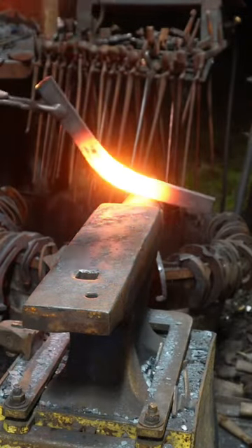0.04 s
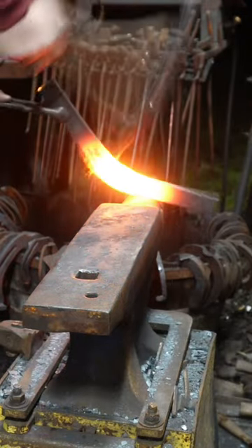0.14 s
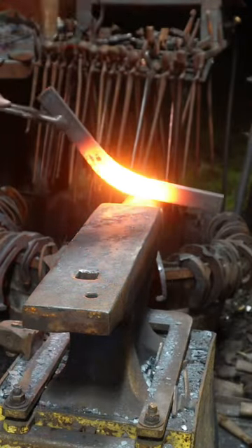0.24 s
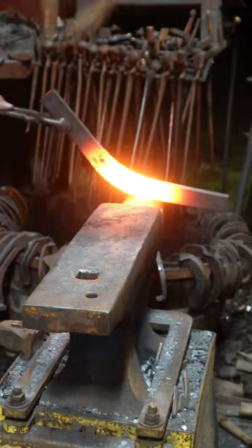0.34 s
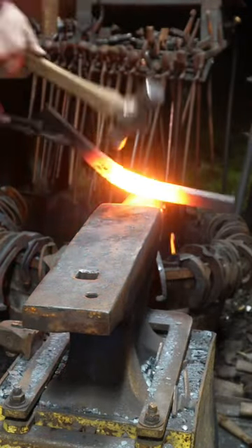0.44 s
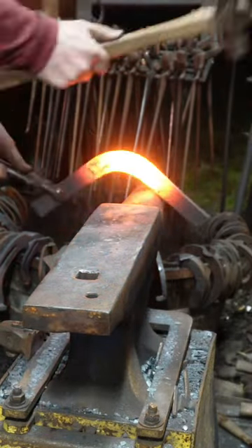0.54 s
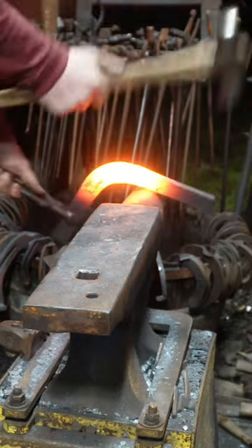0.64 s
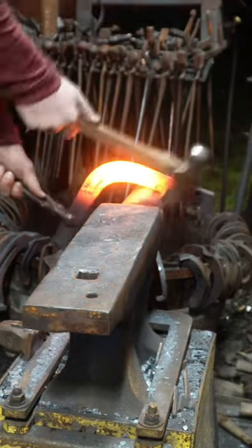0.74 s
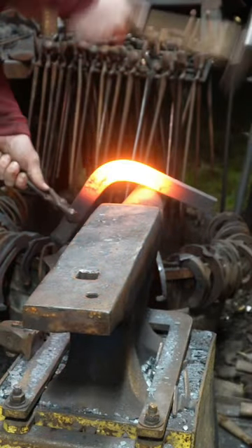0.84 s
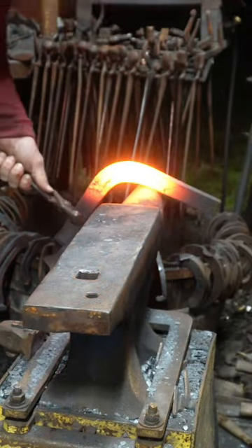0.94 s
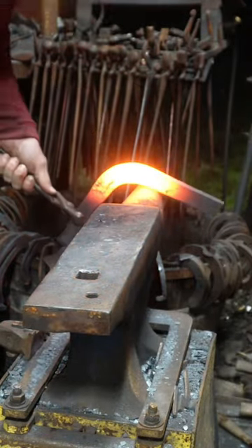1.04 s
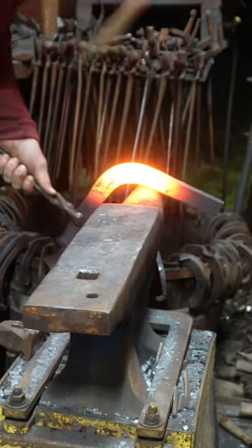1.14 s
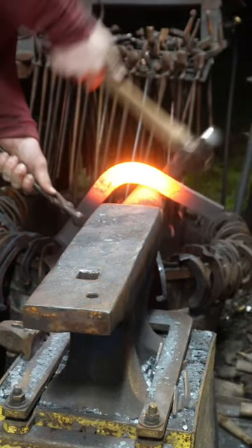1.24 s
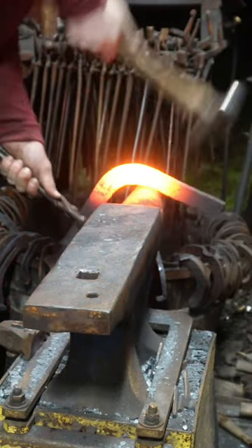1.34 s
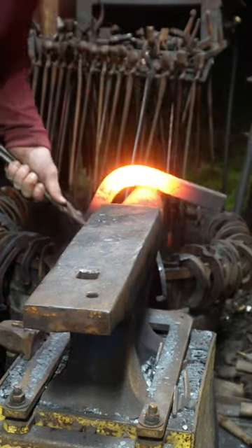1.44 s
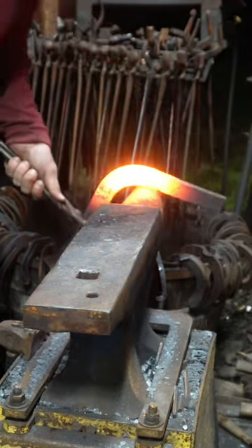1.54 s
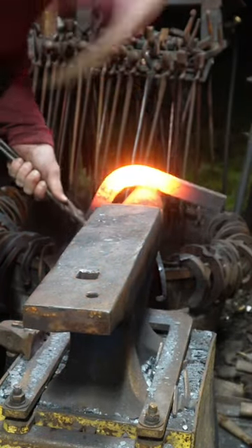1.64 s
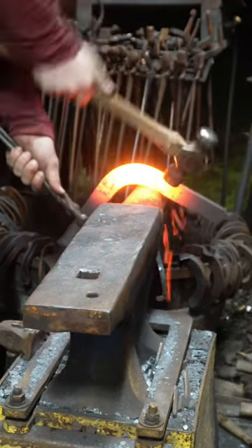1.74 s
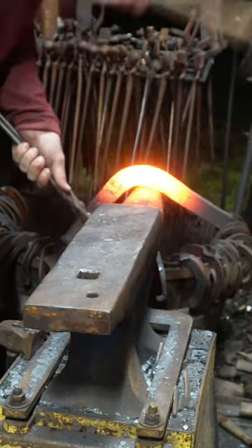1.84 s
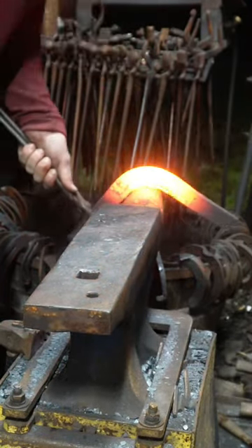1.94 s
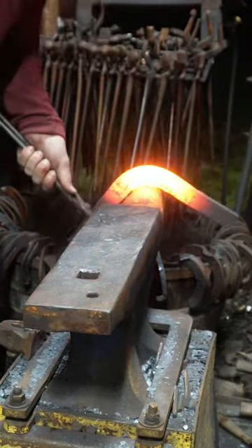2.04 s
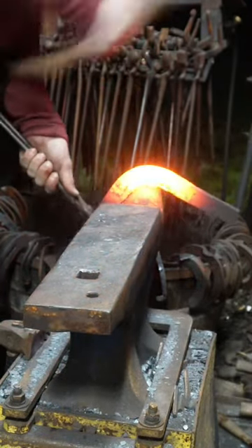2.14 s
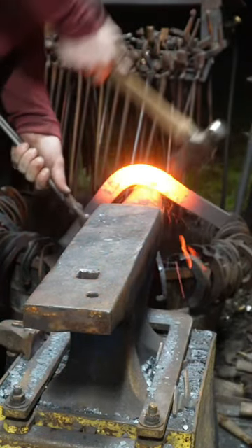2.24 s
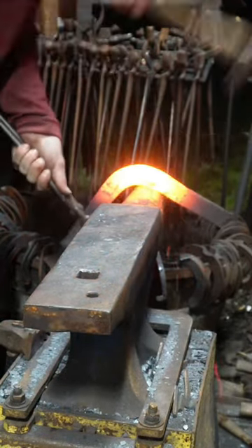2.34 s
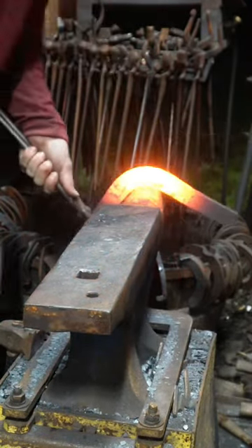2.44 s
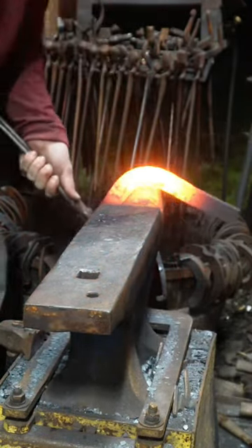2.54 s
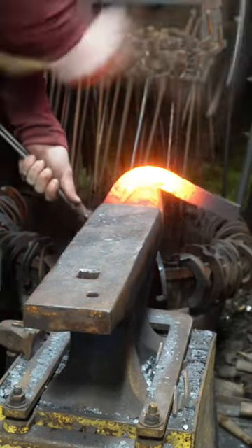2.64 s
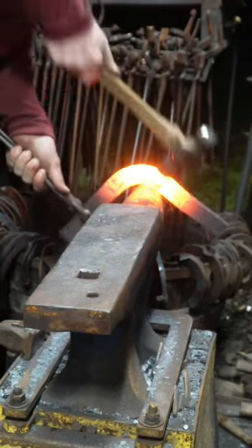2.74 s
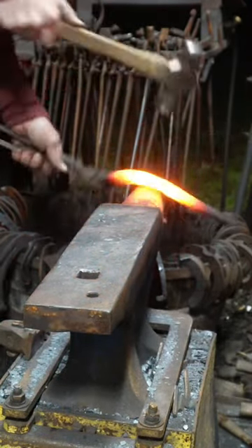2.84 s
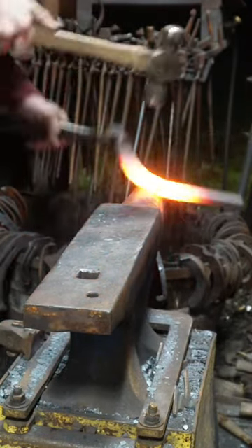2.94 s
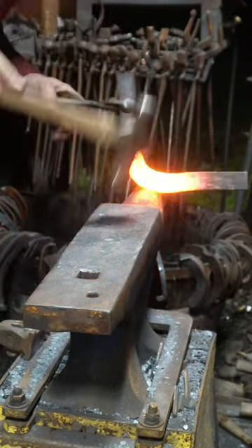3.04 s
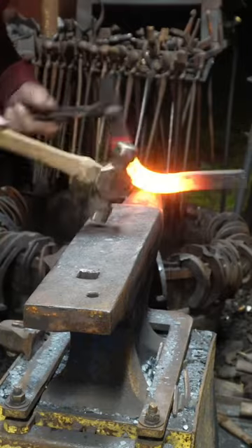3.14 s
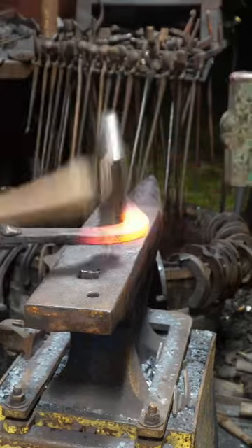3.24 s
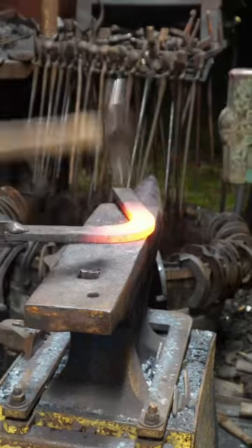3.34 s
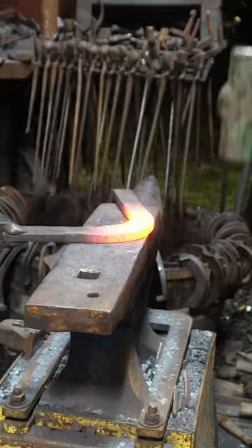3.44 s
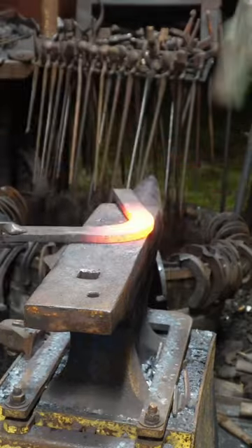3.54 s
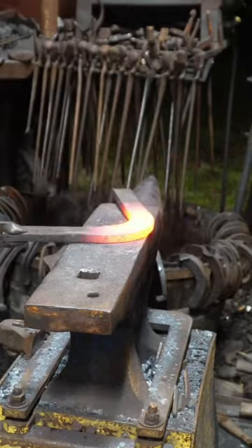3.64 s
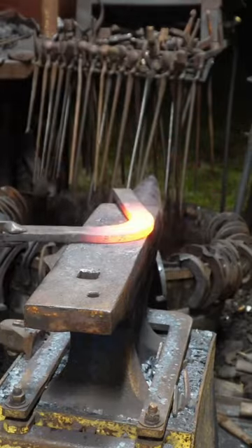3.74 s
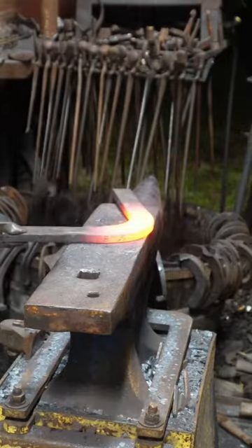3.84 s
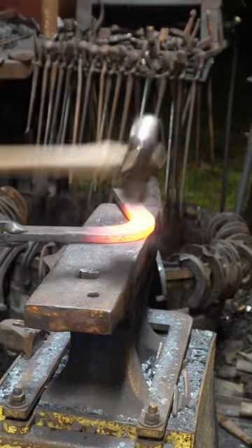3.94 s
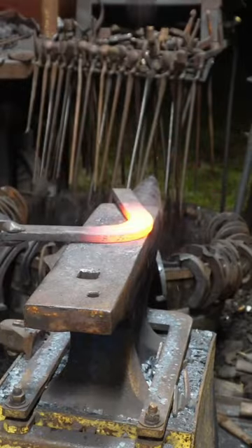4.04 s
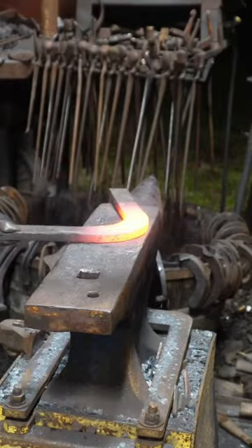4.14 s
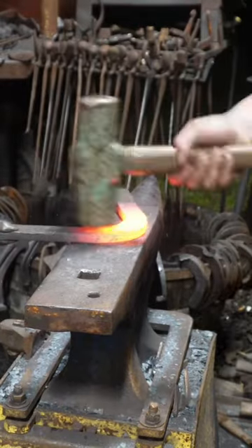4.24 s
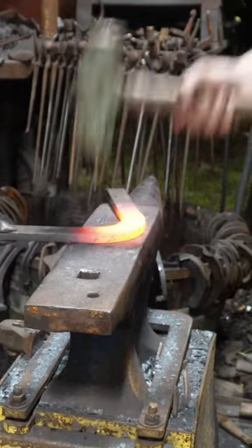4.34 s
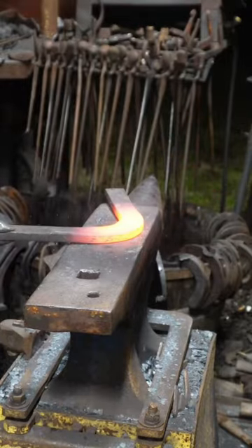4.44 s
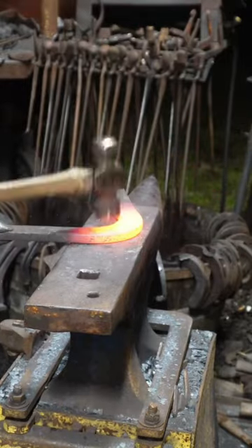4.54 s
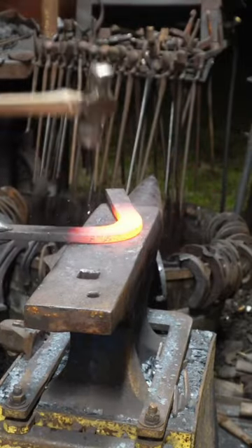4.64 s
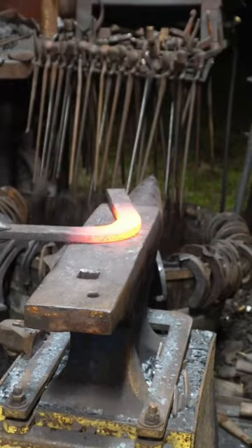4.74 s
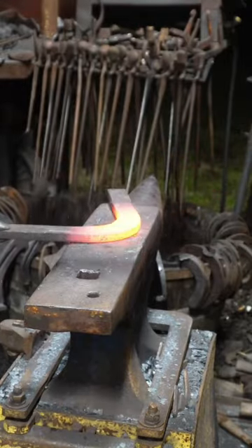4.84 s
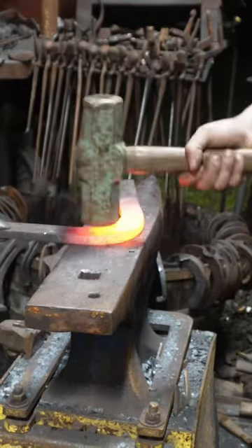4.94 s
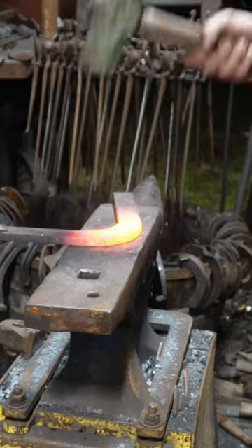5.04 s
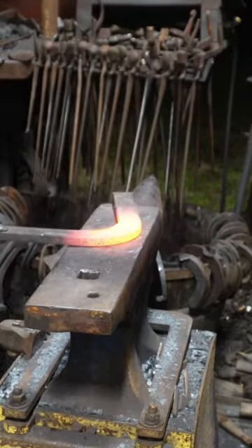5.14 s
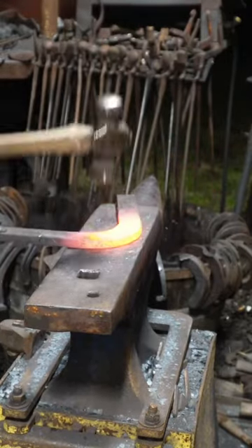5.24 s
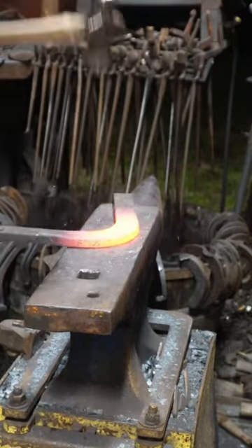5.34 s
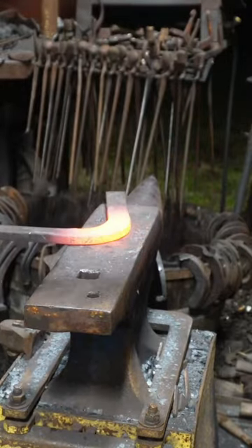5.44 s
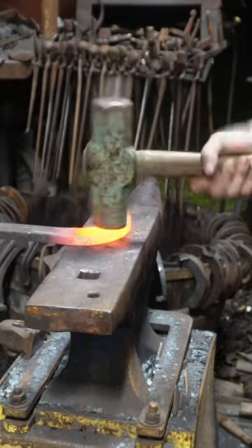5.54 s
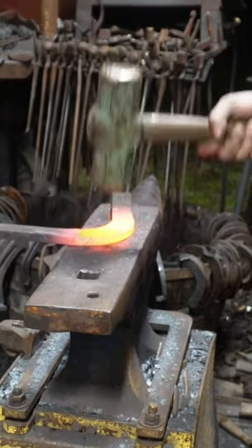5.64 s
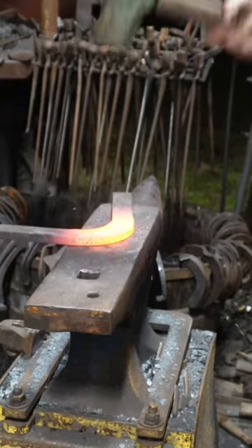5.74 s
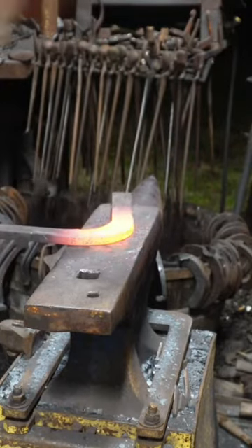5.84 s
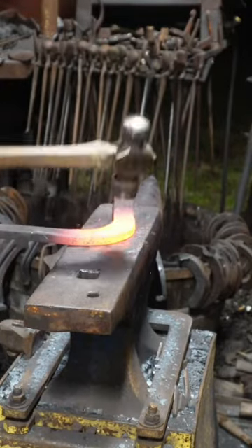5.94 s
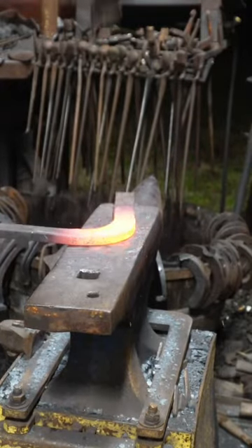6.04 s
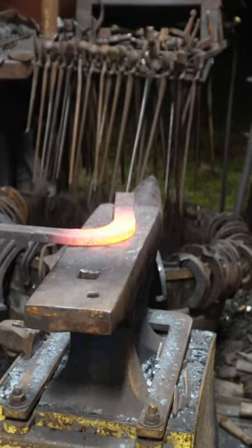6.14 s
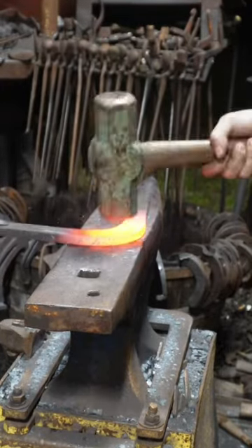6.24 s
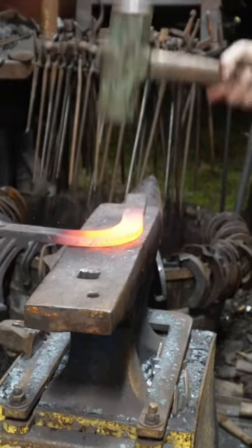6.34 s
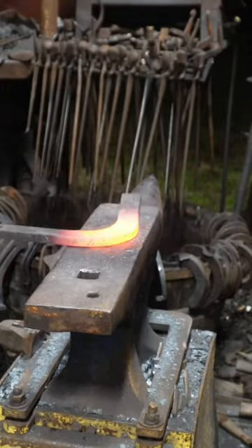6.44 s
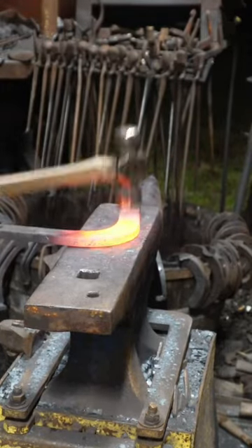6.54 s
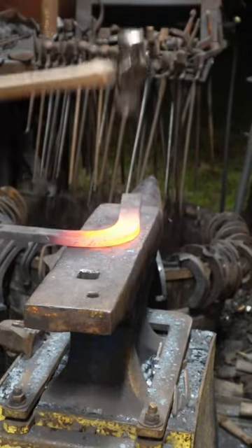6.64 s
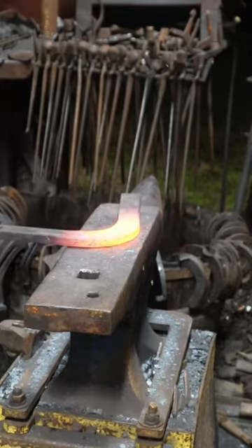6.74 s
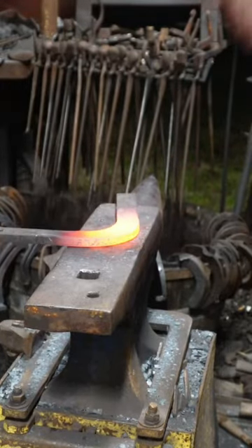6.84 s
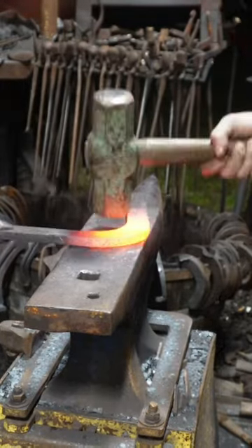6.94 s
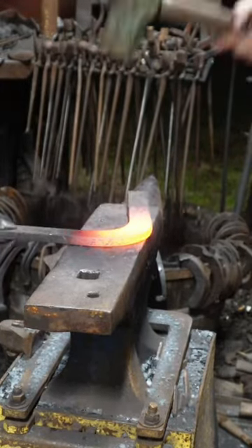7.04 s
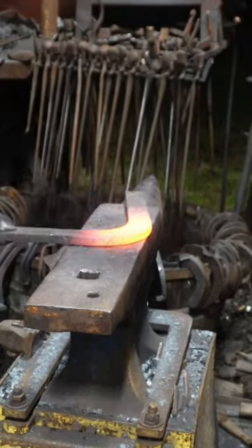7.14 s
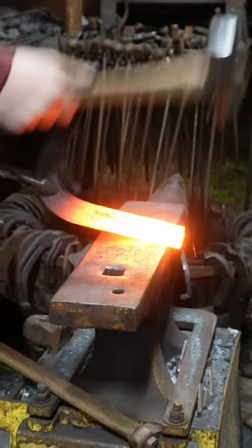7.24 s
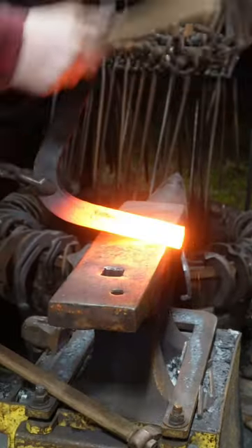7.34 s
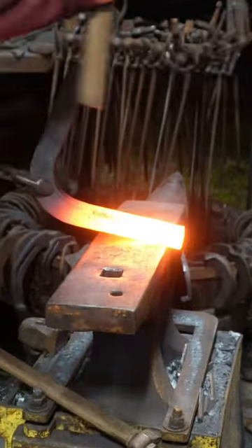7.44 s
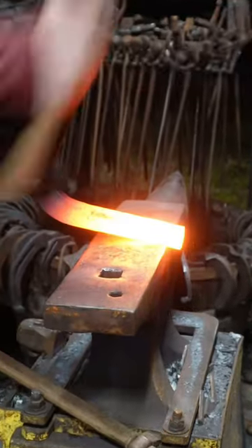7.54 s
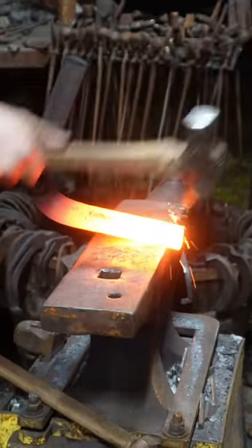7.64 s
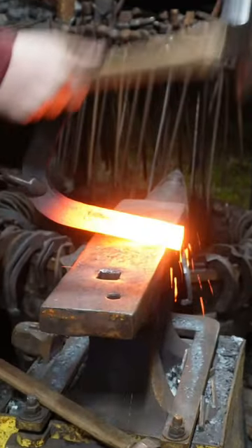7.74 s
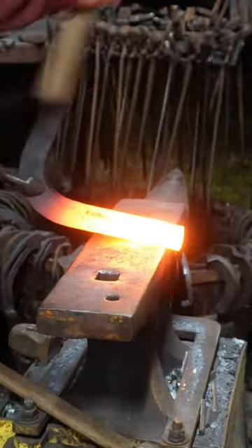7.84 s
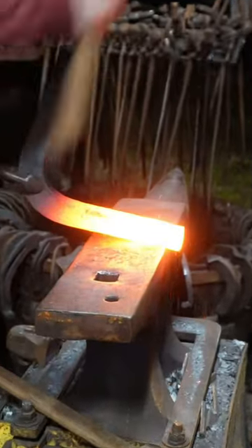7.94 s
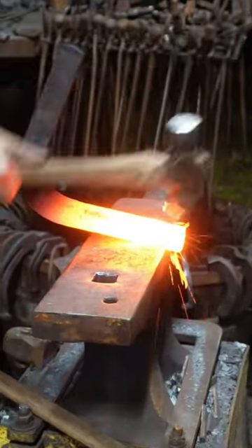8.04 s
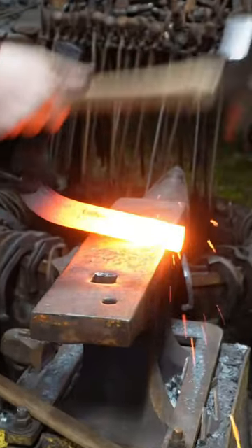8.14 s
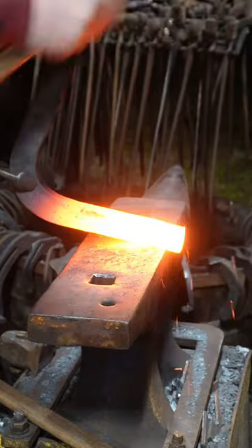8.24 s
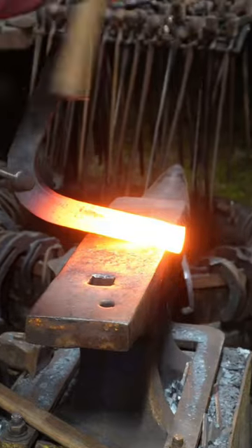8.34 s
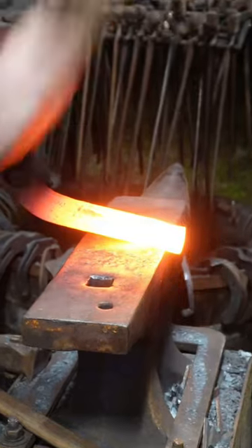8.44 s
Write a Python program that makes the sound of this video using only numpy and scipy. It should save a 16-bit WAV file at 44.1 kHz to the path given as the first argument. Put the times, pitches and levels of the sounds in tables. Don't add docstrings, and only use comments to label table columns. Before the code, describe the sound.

In an open forge shed, a hand hammer and a heavier sledge strike an anvil by turns, rattling tool racks above a steady blower tone and gas hiss.

```python
import sys
import numpy as np
from scipy import signal
from scipy.fft import rfft, irfft, next_fast_len
from scipy.io import wavfile
from scipy.ndimage import uniform_filter1d

SR = 44100
rng = np.random.default_rng(int(sys.argv[2]) if len(sys.argv) > 2 else 0)


def how_loud(loudness_db):
    steps = np.asarray(loudness_db, float) / 20
    return 10 ** steps


def unload_audio(sound):
    columns = np.transpose(np.atleast_2d(sound))
    steps = np.round(np.clip(columns, -1, 1) * 32767)
    wavfile.write(sys.argv[1], SR, steps.astype(np.int16))


N = 373968
KNEE_HZ = 6500


def at_hz(points, hz):
    table_hz, value = np.transpose(points)
    return np.interp(np.log(hz), np.log(table_hz), value)


def butter(x, hz, kind, order):
    return signal.sosfilt(signal.butter(order, hz, kind, fs=SR, output="sos"), x)


def drift(rate_hz):
    r = np.exp(-2 * np.pi * rate_hz * 16 / SR)
    slow = signal.lfilter([1], [1, -2 * r, r * r], rng.standard_normal(N // 16 + 4002))[4000:]
    return np.interp(np.arange(N) / 16, np.arange(len(slow)), slow / slow.std())


def bands(spectrum, likeness, peaky_db, width_hz, top_hz):
    edges_hz = 56 * 2 ** (np.arange(26) / 3)
    centres_hz = np.sqrt(edges_hz[1:] * edges_hz[:-1])
    size = next_fast_len(N)
    bins_hz = np.fft.rfftfreq(size, 1 / SR)
    knots = rng.standard_normal(1200)
    crowd_db = peaky_db * (1 + bins_hz / 9000) * np.interp(bins_hz / width_hz, np.arange(1200), knots)
    crowd = how_loud(crowd_db)
    crowd = crowd / np.sqrt(uniform_filter1d(crowd ** 2, size=size // 40))
    crowd = crowd / (1 + (bins_hz / top_hz) ** 24)
    noise = irfft(rfft(rng.standard_normal((2, 2, size))) * crowd, size)[..., :N]
    noise = noise / noise.std()
    out = []
    for k, hz in enumerate(centres_hz):
        mid, side = butter(noise[k % 2], edges_hz[k:k + 2], "band", order=2)
        alike = np.sqrt(np.clip(at_hz(likeness, hz), 0, 1))
        stereo = np.sqrt(1 + alike) * mid + np.sqrt(1 - alike) * side * [[1], [-1]]
        out.append(how_loud(at_hz(spectrum, hz)) * stereo)
    return np.array(out), centres_hz


def blower(t, level_db):
    phase = 2 * np.pi * np.cumsum(700.35 + 0.487 * drift(0.95)) / SR
    tone = np.sin(phase) + how_loud(-23.5) * np.sin(2 * phase)
    return np.sqrt(2) * tone * how_loud(level_db + 0.67 * drift(9.8)) * how_loud([[.35], [-.35]])


def burner(level_db):
    # hz, level_db_per_hz
    hiss_spectrum = [(60, -62), (100, -61), (170, -25), (215, -16), (280, -26.5), (400, -11), (520, -20),
                     (800, -12.5), (1090, -20.5), (1410, -12.5), (3060, -18), (6020, -19), (6800, -32),
                     (14300, -42.5)]
    # hz, left_right_likeness
    hiss_alike = [(60, 1.0), (180, 0.99), (550, 1), (1650, 0.98), (3000, 1), (4970, 0.27), (15000, 0.041)]
    hiss, _ = bands(hiss_spectrum, hiss_alike, peaky_db=1.5, width_hz=14, top_hz=13400)
    hiss = sum(band * how_loud(0.62 * drift(10)) for band in hiss)
    return hiss / hiss.std() * how_loud(level_db)


def forge():
    # start_s, blower_db, hiss_db
    forge_levels = [(0, -37.5, -45), (.3, -41, -46.5), (.46, -38, -46.5), (.5, -35, -41),
                    (3.102, -36.5, -41), (3.14, -37.5, -40), (7.19, -36.5, -40), (7.221, -34, -41),
                    (8.48, -33.5, -41)]
    s, tone_db, hiss_db = np.transpose(forge_levels)
    t = np.arange(N) / SR
    return blower(t, np.interp(t, s, tone_db)) + burner(np.interp(t, s, hiss_db))


def racks():
    # hz, level_db
    flat_spectrum = [(60, 0), (16000, 0)]
    # hz, left_right_likeness
    wash_alike = [(60, 0.99), (180, 1.0), (550, 1), (1650, 0.99), (4970, 0.5), (15000, 0.04)]
    return bands(flat_spectrum, wash_alike, peaky_db=3.0, width_hz=30, top_hz=14200)


def after(s):
    changes_s = [
        .7,
        3.13,
        7.209,
    ]
    carry_db, fade_s = -24.5, 0.01
    start = round(s * SR)
    t = np.arange(min(N - start, SR // 2 + SR // 4)) / SR
    change = min([c for c in changes_s if c > s] + [np.inf])
    return start, t, how_loud(carry_db * np.clip(1 + (s + t - change) / fade_s, 0, 1) ** 2)


def shape_db(waves, place):
    node_leak = .03
    return 20 * np.log10(abs(np.cos(np.pi * np.array(waves) * place)) + node_leak)


def rings(t, modes, chance, width, beats):
    out = 0
    for (hz, level_db, t60_s), (turn, split, skew) in zip(modes, chance):
        phase = 2 * np.pi * hz * t
        apart = width * min(hz / 5000, 2) * np.array([[1], [-1]])
        beat = 2 * np.pi * beats / t60_s * (1 + hz / 7000) * t
        twins = np.sin(phase + 0.43 * apart + beat * split + turn)
        twins = twins + np.sin(phase - 2.0 * apart + beat * turn + 3.73 * skew)
        main = np.sin(phase + apart * np.tanh(skew))
        out = out + how_loud(level_db - 60 * t / t60_s) * (main + .52 * twins)
    return out


def contact(t, crack, crack_db, tilt_db, dull_db, chance):
    tips = []
    for (hz, db, t60_s), (detune, uneven, _) in zip(crack, chance):
        colour_db = tilt_db * np.log2(hz / 3500) + dull_db * max(np.log2(hz / KNEE_HZ), 0)
        tips.append((hz * how_loud(0.43 * detune), crack_db - 8.5 + db + colour_db + 2.0 * uneven, t60_s))
    snap_hz = [1500 * how_loud(2.0 * min(tilt_db, 0)), 8000 * how_loud(0.46 * dull_db)]
    mid, side = butter(rng.standard_normal((2, len(t))), snap_hz, "band", order=2)
    snap = (mid + 0.017 * side * [[1], [-1]]) * how_loud(crack_db - 3.0 - 60 * t / 0.032)
    onset = 1 - np.exp(-(t / 0.00059) ** 3)
    return (rings(t, tips, chance, width=0.032, beats=3.5) + snap) * onset


def echoes(hit, heard, stretch):
    # delay_s, level_db
    reflections = [
        (.0145, -15),
        (.0215, -11),
        (.027, -13),
        (.036, -15),
    ]
    size = hit.shape[1]
    out = hit * heard[:size]
    dull = signal.lfilter([.6], [1, -.4], hit)
    for delay_s, echo_db in reflections:
        lag = round(delay_s * SR * stretch)
        out[:, lag:] += how_loud(echo_db) * dull[:, :max(size - lag, 0)] * heard[lag:size]
    return out


def steel(t, s, spot, landing, anvil_db, head, head_db, length, chance):
    # list of mode_hz, list of t60_s
    anvil_hz, anvil_t60_s = [1615, 3982, 5547, 11040, 15183], [.36, .2, .3, .25, .6]
    # hz, relative_db, t60_s
    stand = [(1642, -4, .28), (1665, -3, .3), (1690, -6, .26), (1780, -5, .28)]
    anvil_waves = [5, 5.5, 6, 6.5, 7.5]
    head_waves = [2, 3, 5, 5.5, 6]
    body_db = anvil_db + shape_db(anvil_waves, spot)
    face_db = head_db + shape_db(head_waves, landing)
    horn_db = 5 * (s < 2.8)
    modes = list(zip(anvil_hz, body_db, anvil_t60_s)) + list(zip(head[0], face_db, head[1]))
    modes += [(hz, body_db[0] + db + horn_db, t60_s) for hz, db, t60_s in stand]
    modes = [(hz * length, db, t60_s) for hz, db, t60_s in modes]
    return rings(t / length, modes, chance, width=0.44, beats=7.3) * (1 - np.exp(-t / 0.013))


def wash_swell(t, level_db, length, centres_hz):
    # hz, t60_s
    wash_t60 = [(150, 0.45), (400, 0.37), (1000, 0.4), (2800, 0.36), (7000, 0.29), (14000, 0.23)]
    hz = centres_hz[:, None]
    rise = 1 - 0.86 * np.exp(-(t / (0.011 + 0.28 / hz)) ** 2)
    return rise * how_loud(level_db - 60 * t / (length * at_hz(wash_t60, hz)))


def blows(strikes, work, anvil_db, crack, head, head_db, colour, wash, centres_hz):
    out, swell = np.zeros((2, N)), np.zeros((len(centres_hz), N))
    hz = centres_hz[:, None]
    colour_db = at_hz(colour, hz)
    octaves_above = np.maximum(np.log2(hz / KNEE_HZ), 0)
    chances = rng.standard_normal((len(strikes), 24, 3))
    for (s, wash_db, spot, landing, ring_db), chance in zip(strikes, chances):
        kind = np.searchsorted(np.array(work)[:, 0], s) - 1
        _, over_db, tilt_db, length, dull_db = work[kind]
        start, t, heard = after(s)
        short = t[:SR // 16]
        hit = contact(short, crack, wash_db + over_db, tilt_db, dull_db, chance[19:])
        out[:, start:start + len(short)] += echoes(hit, heard, stretch=how_loud(0.32 * chance[18, 0]))
        body_db = wash_db + np.array(anvil_db[kind])
        face_db = wash_db + ring_db + np.array(head_db)
        ring = steel(t, s, spot, landing, body_db, head, face_db, length, chance)
        out[:, start:start + len(t)] += heard * ring
        level_db = wash_db + 15.5 + colour_db + tilt_db * np.log2(hz / 3500) + dull_db * octaves_above
        swell[:, start:start + len(t)] += heard * wash_swell(t, level_db, length, centres_hz)
    clatter = how_loud(1.8 * drift(200))
    return out + clatter * np.einsum("bcn,bn->cn", wash, swell)


def sledge_hammer(wash, centres_hz):
    # start_s, strength_db, anvil_spot (0-1), face_spot (0-1), head_ring_db
    strikes = [
        (4.216, -10, 0.27, 0.56, -1.5),
        (4.889, -9, 0.92, 0.56, -1),
        (5.534, -8, 0.44, 0.28, -0.5),
        (6.192, -11, 0.44, 0.63, -4),
        (6.87, -4.5, 0.14, 0.27, 1.5),
    ]
    # start_s, crack_over_wash_db, tilt_db_per_octave, length_factor, dulling_db_per_octave above the knee
    work = [
        (0, 16.8, 0.01, 0.94, -5),
    ]
    # five columns in db, one row per kind of work
    anvil_db = [(5, -11, 0.45, -17, -33)]
    # hz, level_db, t60_s
    crack = [(1420, 4.5, 0.0133), (2600, -32, 0.0056), (4100, -30, 0.0095), (6500, 0, 0.012),
             (12950, 8, 0.003)]
    # list of mode_hz, list of t60_s
    head = [3085, 6972, 8710, 12055, 13005], [.36, .26, .9, .34, .34]
    head_db = [-17, -1.5, -26, -19, -8]
    # hz, level_db_per_hz
    colour = [(60, -48), (100, -38), (190, -16.5), (535, -22.5), (800, -11), (1230, -13), (1700, -5.5),
              (2860, -12.5), (4500, -12), (7000, -17), (8500, -17.5), (11000, -27.5), (14000, -22),
              (16500, -55)]
    return blows(strikes, work, anvil_db, crack, head, head_db, colour, wash, centres_hz)


def hand_hammer(wash, centres_hz):
    # start_s, strength_db, anvil_spot (0-1), face_spot (0-1), head_ring_db
    strikes = [(0.113, -22, 0.015, 0.5, -15), (0.354, -21.5, 0.425, 0.825, -21),
               (0.706, -17, 0.19, 0.89, -6.0), (1.192, -18, 0.61, 0.83, -20.0),
               (1.679, -19.0, 0.42, 0.83, -13.5), (2.166, -19.5, 0.085, 0.815, -9),
               (2.645, -19, 0.275, 0.845, -22.0), (2.905, -41, 0.095, 0.495, -18),
               (3.106, -25.5, 0.095, 0.34, -19), (3.258, -18.5, 0.01, 0.475, -6),
               (3.86, -10, 0.75, 0.295, -17), (4.533, -11, 0.08, 0.33, -11.5),
               (5.197, -9.5, 0.43, 0.23, -2), (5.862, -11.5, 0.425, 0.49, -11.5),
               (6.528, -8.5, 0.84, 0.77, -10.5), (7.193, -12.5, 0.105, 0, -15),
               (7.573, -20, 0.735, 0.48, -13), (8.022, -19, 1, 0.17, -13), (8.4675, -21, 0.08, 0.16, -12.0)]
    # start_s, crack_over_wash_db, tilt_db_per_octave, length_factor, dulling_db_per_octave above the knee
    work = [
        (0, -15, 3, 0.49, -14),
        (.7, 25.5, -0.76, 0.9, -13.5),
        (3.2, 26.5, 2.5, 1.145, -18.5),
        (3.5, 18, 2, 0.99, -3),
        (7.3, 21, -1.64, 0.84, -5.5),
    ]
    # five columns in db, one row per kind of work
    anvil_db = [(-19, 0, -10, -41, -63), (2.0, 2, -1, -36, -49), (-29, 14.5, 1, -11, -33),
                (-8, -20, 3, -8.5, -24), (-4.5, -13, -4, -31, -44)]
    # hz, level_db, t60_s
    crack = [(1980, -12.5, 0.013), (3565, 5, 0.01), (5380, -4, 0.005), (7960, -6.5, 0.018),
             (14100, -24, 0.0037)]
    # list of mode_hz, list of t60_s
    head = [3440, 8236, 9435, 13430, 15570], [.27, .22, .52, .26, .33]
    head_db = [10, 13.5, -5.5, -5, -24]
    # hz, level_db_per_hz
    colour = [(60, -52), (100, -39), (200, -22.5), (415, -22), (700, -24.5), (950, -14), (2300, -5),
              (2750, -11), (3500, -4), (6000, -14.5), (8500, -20.5), (11000, -24.5), (14000, -25),
              (16500, -48)]
    return blows(strikes, work, anvil_db, crack, head, head_db, colour, wash, centres_hz)


def scene():
    wash, centres_hz = racks()
    return forge() + sledge_hammer(wash, centres_hz) + hand_hammer(wash, centres_hz)


def limiter(x):
    ceiling_db, attack_s, release_db_per_s = -4.5, 0.0016, 375
    over_db = np.maximum(20 * np.log10(abs(x).max(axis=0) + 1e-9) - ceiling_db, 0)
    ramp_db = release_db_per_s * np.arange(N) / SR
    held_db = np.maximum.accumulate(over_db + ramp_db) - ramp_db
    lag = np.exp(-1 / (attack_s * SR))
    return x * how_loud(-signal.lfilter([1 - lag], [1, -lag], held_db))


def low_pass(x):
    return signal.sosfilt(signal.butter(12, 16810, fs=SR, output="sos"), x)


def record(dry):
    x = limiter(dry)
    x = x / (1 + (abs(x) / .78) ** 4) ** .25
    x = butter(x, 16300, "low", order=8)
    x = butter(x, 180, "high", order=2)
    return low_pass(x)


dry = scene()
out = record(dry)
unload_audio(out)
```